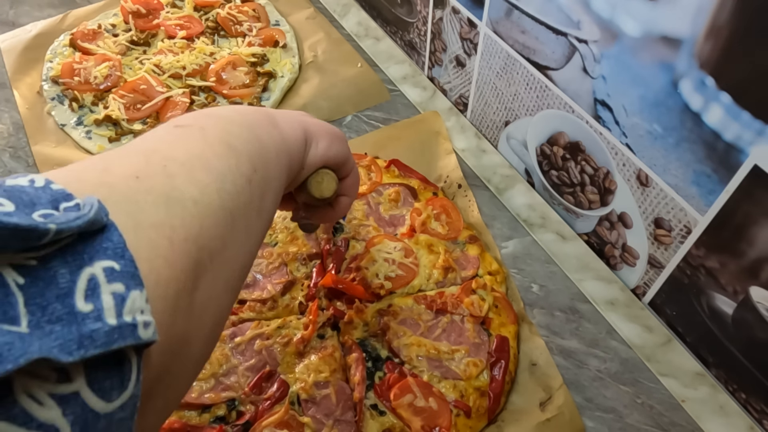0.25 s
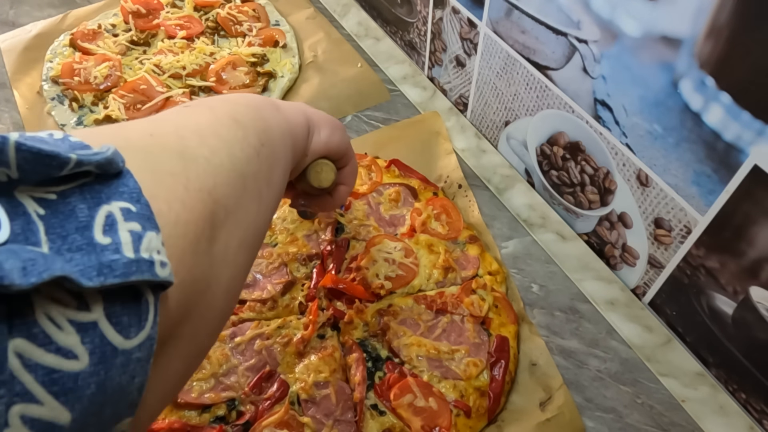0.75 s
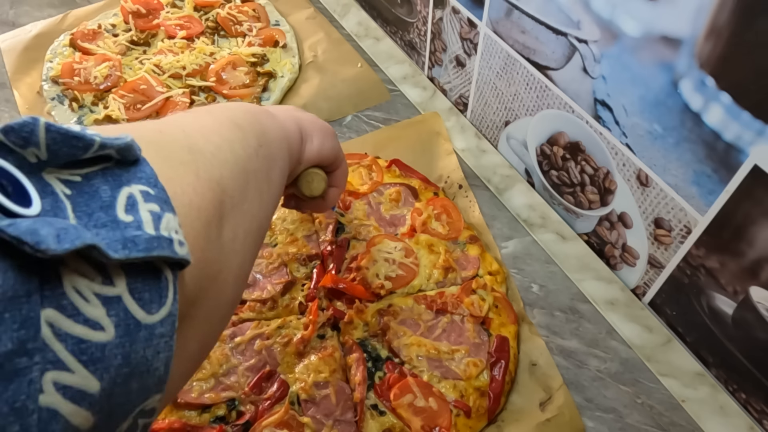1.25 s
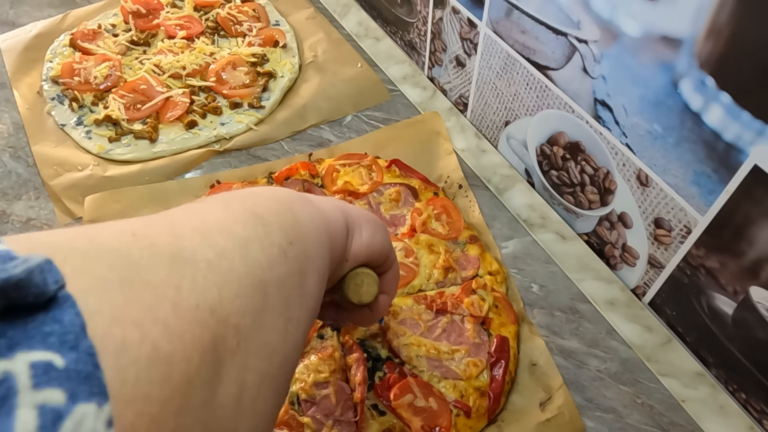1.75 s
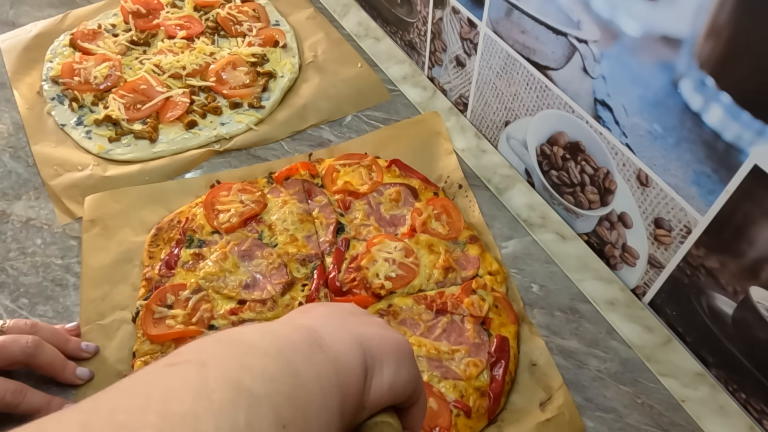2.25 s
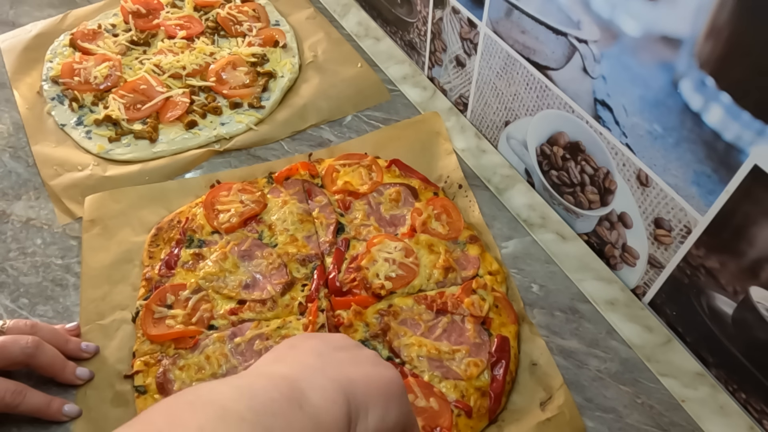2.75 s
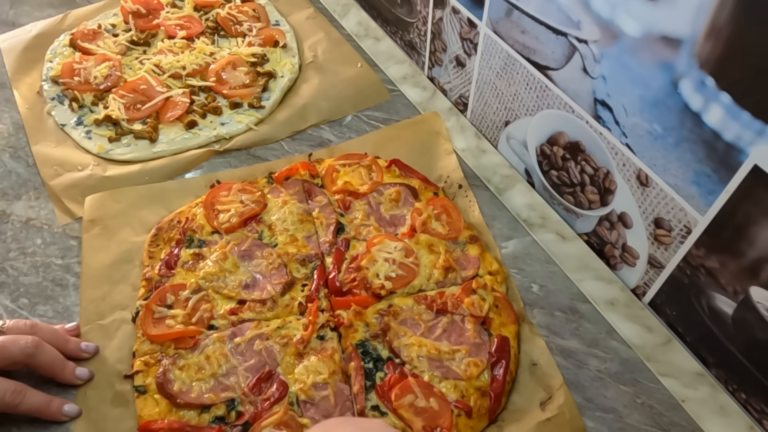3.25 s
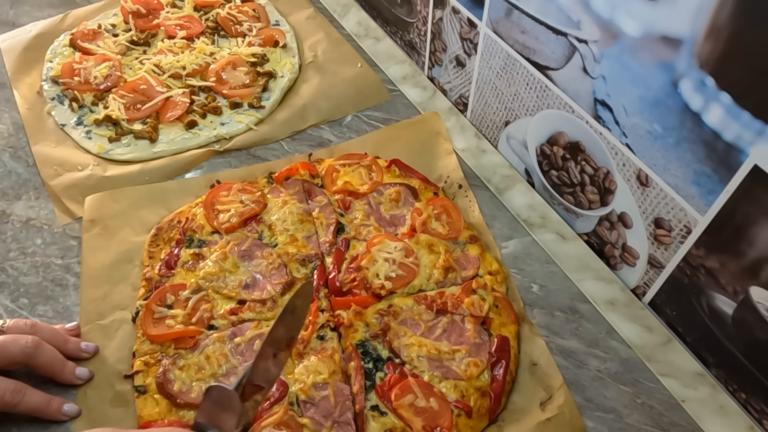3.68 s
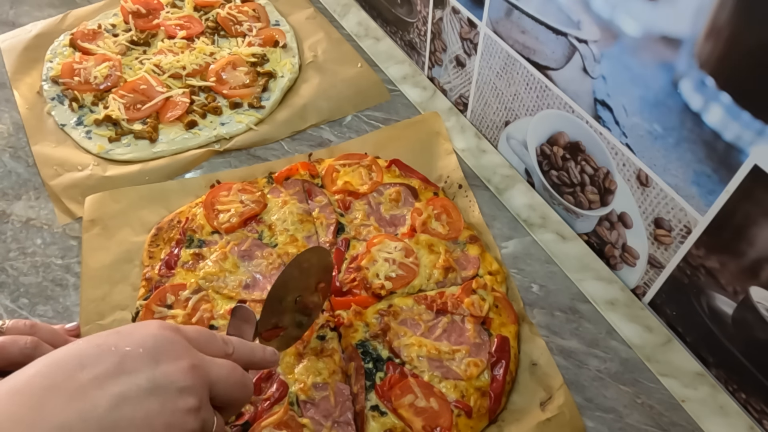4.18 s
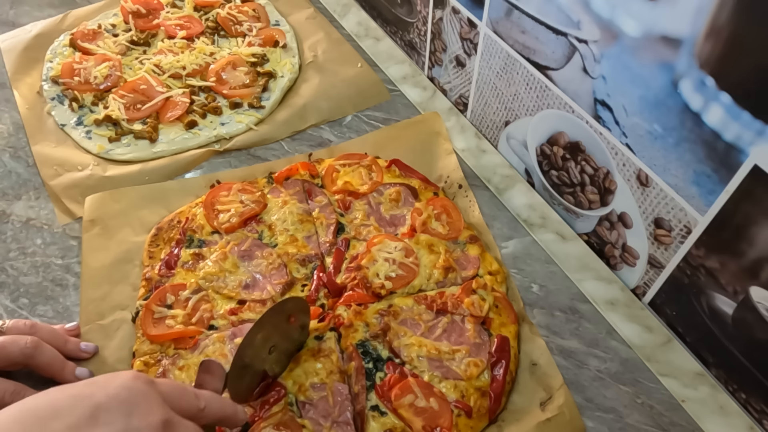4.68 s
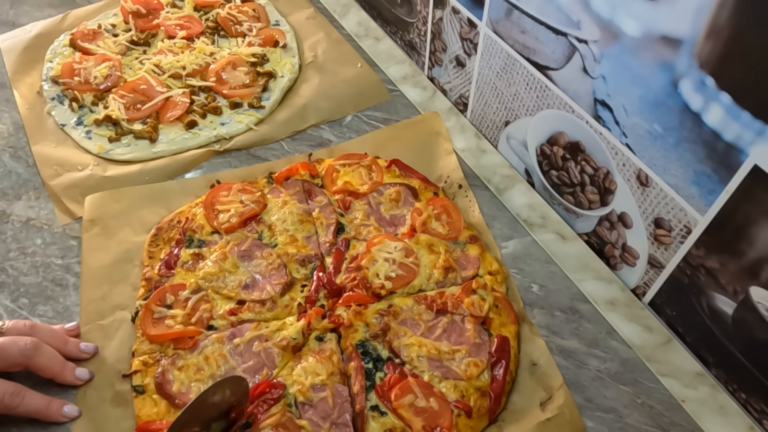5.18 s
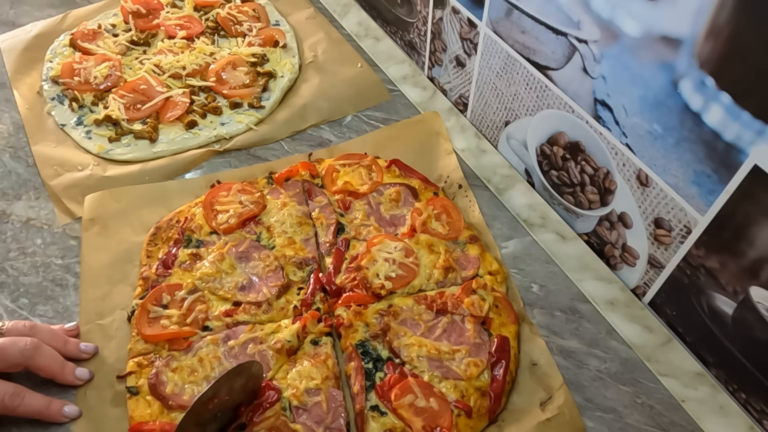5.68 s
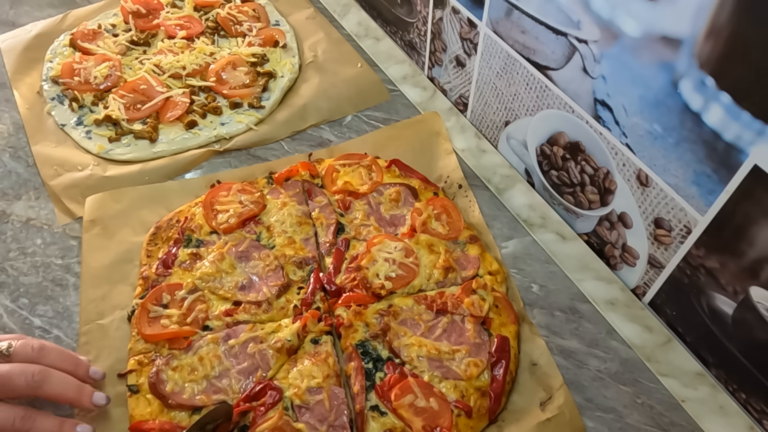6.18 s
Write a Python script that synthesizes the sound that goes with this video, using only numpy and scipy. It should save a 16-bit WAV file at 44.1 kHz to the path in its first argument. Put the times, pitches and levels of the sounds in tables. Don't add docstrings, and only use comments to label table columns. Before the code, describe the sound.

A close stereo microphone hears a steel cutting wheel pressing through baked pizza on paper. Crisp snaps, papery ticks and gritty rumbling come in uneven strokes, with low wooden thumps from the hollow counter. Midway the loose wheel rattles and faintly squeaks; then the last cut crunches up to a sharp, booming knock. Tiled walls add a short bright echo over quiet distant appliances.

```python
import sys
import numpy as np
from scipy import signal
from scipy.fft import rfft, irfft, next_fast_len
from scipy.io import wavfile
from scipy.ndimage import uniform_filter1d, map_coordinates

SR = 44100
rng = np.random.default_rng(int(sys.argv[2]) if len(sys.argv) > 2 else 0)


def store_pcm(level_fs):
    pcm = np.round(np.clip(level_fs, -1, 1) * 32767).astype(np.int16)
    wavfile.write(sys.argv[1], SR, np.atleast_2d(pcm).T)


def field_ratio(decibels):
    return 10 ** (np.asarray(decibels, dtype=float) / 20)


N = 283563
BASS_EDGE_HZ = 560
PORTS = np.array([[1], [-1]])


def colour(x, spectrum):
    hz, db = np.transpose(spectrum)
    size = next_fast_len(x.shape[-1])
    f = np.maximum(np.fft.rfftfreq(size, 1 / SR), 1)
    gain = field_ratio(np.interp(np.log(f), np.log(hz), db))
    return irfft(rfft(x, size) * gain, size)[..., :x.shape[-1]]


def unit(x):
    return x / np.sqrt(np.mean(x ** 2))


def band(x, lo_hz, hi_hz):
    sos = signal.butter(2, [lo_hz, min(hi_hz, .45 * SR)], "band", fs=SR, output="sos")
    return signal.sosfilt(sos, x)


def ring(modes, gains, stretch=0.86, size=14000):
    heard = gains > 0
    hz, db, t60 = np.transpose(modes)[:, heard, None]
    t = np.arange(size) / SR
    pole = 2j * np.pi * hz - np.log(1000) / (t60 * max(stretch, .2))
    return (gains[heard] * field_ratio(db[:, 0])) @ np.exp(pole * t).imag


def add(out, s, sound, peak_db):
    i = int(s * SR)
    n = min(len(sound), N - i)
    out[..., i:i + n] += np.multiply.outer(field_ratio(peak_db), sound[:n] / np.abs(sound).max())


def grit(rate, spread_db):
    out, count = np.zeros(N), int(rate * N / SR)
    sizes = field_ratio(spread_db * rng.exponential(size=count))
    out[rng.integers(0, N, count)] = sizes * rng.standard_normal(count)
    return out


def flicker(rate, depth_db):
    k = int(SR / rate)
    steps = np.repeat(rng.standard_normal(N // k + 1), k)[:N]
    return field_ratio(depth_db * uniform_filter1d(steps, k))


def swells(base_db, rows):
    out = field_ratio(base_db)
    for s, db, rise_ms, fall_ms in rows:
        i = np.arange(max(int((s - .2) * SR), 0), min(int((s + .2) * SR), N))
        lag_ms = 1e3 * (i / SR - s)
        out[i] += field_ratio(db) * np.exp(-np.abs(lag_ms) / np.where(lag_ms < 0, rise_ms, fall_ms))
    return out


# [from t/s, place: 0 back, 1 mid-slab, 2 front]
PLACES = [
    (0, 0),
    (1.005, 1),
    (1.04, 0),
    (1.9, 1),
    (3.57, 2),
    (6.005, 0),
]


def place(s):
    since, where = np.transpose(PLACES)
    return where.astype(int)[np.searchsorted(since, s, side="right") - 1]


# [f/Hz, level/dB, t60/s, extra level/dB mid-slab, extra level/dB at the front edge]
PANEL_MODES = [(159.2, -2, 0.11, -1, -6), (178.4, -5, 0.053, 4, 10.5), (248, -0.5, 0.089, -2, -2),
               (336, 0, 0.037, 1.5, 2.5), (388.5, 6, 0.066, 2.5, -4.5), (437.6, 4.5, 0.071, -1, -14),
               (580, -10, 0.02, 9, -6), (750, -0.5, 0.045, -4.5, 6), (994, 3.5, 0.019, -18.5, 7.5),
               (1159, 8, 0.019, 7, -7.5), (1267, 2, 0.035, 0.5, 1.5), (1363, -6, 0.017, 8.5, 8.5),
               (1564, -8.5, 0.016, 9, 14), (2890, -9, 0.036, 3.5, -15)]


def panels(lo_hz, hi_hz, stretch, where, spot=1., size=6000):
    modes = np.array(PANEL_MODES)
    inside = (modes[:, 0] > lo_hz) * (modes[:, 0] < hi_hz)
    gains = spot * field_ratio((where > 0) * modes[:, 2 + where]) * inside
    return band(ring(modes[:, :3], gains, stretch, size), lo_hz, hi_hz)


# [t/s, edge pressure on the counter level/dB, breaking crumbs level/dB]
ROLL = [(0.0, -58.5, -69.5), (.25, -68, -68), (.72, -70.5, -65), (1.3, -64, -69.5), (1.75, -59.5, -73.5),
        (1.95, -64.5, -76.5), (2.401, -75, -74.5), (2.55, -67, -67.5), (2.95, -72, -77), (3.3, -84, -74),
        (3.55, -61.5, -88), (3.8, -74, -71), (4.249, -79, -98), (4.7, -73, -70), (4.98, -60.5, -66),
        (5.15, -65, -76.5), (6.25, -62, -81.5), (6.43, -73.5, -73)]


def rolling():
    s, *columns = np.transpose(ROLL)
    pressure_db, crunch_db = (np.interp(np.arange(N) / SR, s, c) for c in columns)
    return crunching(crunch_db) + grinding(pressure_db) + rocking()


# [t/s of the top, rms level/dB, rise/ms, fall/ms]
CRUSHES = [(.1, -71, 8.4, 73), (0.598, -43, 17, 22), (.73, -78, 8.5, 32), (.84, -67, 43, 11),
           (.96, -52, 9.6, 21), (1.027, -35, 18, 10), (1.177, -42, 9.4, 5.6), (1.224, -41.5, 11, 17),
           (1.36, -49, 9.7, 12), (1.44, -64.5, 28, 240), (2.07, -80, 17, 72), (2.191, -57, 7.2, 11),
           (2.47, -65, 15, 64), (2.604, -47, 3.3, 6.6), (2.7, -55, 19, 19), (2.83, -52, 10.5, 37),
           (3.0, -74, 6, 10), (3.059, -62.5, 23, 43), (3.22, -70, 14, 36), (3.385, -64, 12, 16),
           (3.457, -39.5, 14.5, 15.4), (3.63, -55.5, 37, 39), (4.44, -59.5, 34, 72), (4.8, -59, 21, 18),
           (4.875, -59, 19, 20), (5.06, -63.5, 47, 25), (5.228, -71, 7.3, 7.2), (5.25, -57, 37, 16),
           (5.32, -45, 26, 26), (5.43, -52, 13, 29), (5.5, -65, 6.9, 8.9), (5.592, -51, 5.5, 5.9),
           (5.62, -64, 29, 64), (5.673, -33, 21, 14.5), (5.74, -52.5, 7.6, 15), (5.824, -45, 23, 14),
           (5.852, -59, 5, 10), (5.947, -43.5, 11.5, 17), (5.988, -31, 5.4, 4.9), (6.15, -51.5, 120, 75)]
# [f/Hz, level/dB per Hz]
CRUST_SPECTRUM = [(880, -36), (1500, 1.5), (1940, -5), (2110, -2), (2450, 0), (3350, -1), (4080, -3.5),
                  (5120, -2), (5530, -3), (7730, -3.5), (9600, -15), (12300, -11.5), (15700, -27)]


def crunching(crunch_db):
    clusters, crumbs = flicker(250, 2.0), 0
    for lo_hz, hi_hz in [(900, 3500), (3500, 7000), (7000, 18000)]:
        patchy = clusters * flicker(23, 3.7)
        mid, side = (grit(3000, 2.3) * patchy for _ in "ms")
        crumbs = crumbs + band(mid + 0.45 * side * PORTS, lo_hz, hi_hz)
    return swells(crunch_db, CRUSHES) * unit(colour(crumbs, CRUST_SPECTRUM))


# [t/s of the top, rumble level/dB, bass
# level/dB, fall/ms]
GRINDS = [(.34, -65, -63.5, 110), (0.595, -47.5, -50, 19), (0.826, -57, -42, 13.4), (0.909, -53, -59, 11),
          (0.954, -45, -38.5, 19), (1.015, -41, -36, 16), (1.029, -46, -21.5, 9), (1.07, -52, -48, 22),
          (1.146, -49, -58, 4.8), (1.17, -51.5, -48.5, 33), (1.199, -51, -52, 8), (1.268, -42.5, -52, 4.7),
          (1.225, -40, -40, 20.7), (1.36, -39.5, -34.5, 11.3), (1.405, -52.5, -47.5, 15),
          (1.566, -49, -53, 14), (1.596, -42.5, -41, 29), (1.668, -43, -43.5, 24), (1.71, -51.5, -71, 40),
          (2.07, -58, -62, 76), (2.19, -57, -63, 19), (2.499, -55.5, -63, 29), (2.635, -46.5, -41, 31),
          (2.75, -60, -55, 23), (2.828, -44, -38.5, 28.5), (2.877, -50.5, -46, 12), (2.984, -55, -72, 6.2),
          (3.018, -51.5, -43.5, 7.5), (3.044, -45.5, -42, 9), (3.084, -54, -50.5, 83), (3.19, -67, -62, 20),
          (3.245, -53, -48, 20), (3.36, -55, -69, 6.7), (3.388, -50.5, -45, 27), (3.459, -35, -35, 15.2),
          (3.65, -56, -59, 64),
          (3.85, -66, -75, 51), (4.0, -65.5, -60.5, 120), (4.8, -75, -57, 17), (4.86, -65, -54, 25),
                (5.041, -65, -50, 42), (5.2, -54.5, -46, 15), (5.231, -49.5, -39, 16),
                (5.301, -52.5, -45.5, 26), (5.343, -45.5, -38.5, 11.5), (5.46, -71, -50, 18),
                (5.595, -54, -41.5, 13), (5.66, -42.5, -38, 35), (5.715, -56, -48, 20),
                (5.833, -45.5, -32, 17.7), (5.961, -44, -46, 29), (5.987, -34, -28, 6.4),
                (6.04, -36, -67, 54), (6.1, -45, -68, 11), (6.15, -54, -68, 11), (6.19, -53, -57, 17),
                (6.3, -58, -60, 20)]


def grinding(pressure_db):
    where, grinds = place(np.arange(N) / SR), GRINDS
    rise_share = 0.6
    rumble = swells(pressure_db, [(s, db, rise_share * ms, ms) for s, db, _, ms in grinds])
    bass = swells(pressure_db, [(s, db, rise_share * ms, ms) for s, _, db, ms in grinds])
    out = np.zeros(N)
    for lo_hz, hi_hz, force in [(BASS_EDGE_HZ, 3300, rumble), (125, BASS_EDGE_HZ, bass)]:
        push = force * unit(grit(4000, 1.5) * flicker(40, 2))
        for spot in range(3):
            answer = panels(lo_hz, hi_hz, 0.8, spot)
            answer = answer / np.linalg.norm(answer)
            out += signal.fftconvolve(push * (where == spot), answer)[:N]
    return out


# [t/s, level/dB]
LEANS = [(.3, -62), (.59, -54), (1.029, -35), (1.08, -42), (1.25, -48.5), (1.41, -56), (1.7, -54),
         (2.22, -60), (2.61, -47), (2.8, -46), (2.92, -48), (3.1, -51), (3.25, -51), (3.5, -61),
         (3.92, -61.5), (4.69, -58), (5.0, -53), (5.37, -53), (5.52, -49), (6.0, -37)]
# [f/Hz, level/dB, t60/s]
FRAME = [
    (38.6, 0, 0.22),
    (57.8, -9.5, 0.2),
]


def rocking():
    rest_db, rise_ms, fall_ms = -61., 43, 36
    shake = swells(np.full(N, rest_db), [(s, db, rise_ms, fall_ms) for s, db in LEANS])
    frame = band(ring(FRAME, np.ones(len(FRAME)), 0.69, size=9000), 34.7, 68)
    push = shake * unit(grit(4000, 1.3) * flicker(40, 1.6))
    return signal.fftconvolve(push, frame / np.linalg.norm(frame))[:N]


# [t/s, peak level/dB, centre f/Hz]
CRUST_SNAPS = [(0.5023, -52, 2300), (0.5946, -47, 2800), (0.6373, -45, 2760), (0.8172, -34.5, 2460),
               (0.948, -36, 2620), (0.9547, -31.5, 3080), (0.998, -36, 4500), (1.0113, -26, 3850),
               (1.022, -29, 3200), (1.2222, -36.5, 2560), (1.2496, -34, 3040), (1.3286, -45, 2800),
               (1.348, -39, 3400), (1.3587, -30, 2900), (1.3983, -42, 2290), (1.557, -41, 2380),
               (1.6472, -48, 2130), (1.6644, -43, 2140), (2.0597, -50.5, 2850), (2.186, -63, 2900),
               (2.493, -50, 2960), (2.702, -55, 2830), (2.7178, -36, 2450), (2.7834, -43, 2840),
               (2.8137, -41, 2560), (2.821, -33, 2760), (2.839, -38, 2200), (3.0705, -41.5, 2220),
               (3.448, -34.5, 4030), (3.4513, -37, 1570), (3.462, -32, 1700), (5.2276, -53, 5300),
               (5.246, -48, 3570), (5.2836, -49, 3990), (5.434, -45, 3050), (5.471, -43.5, 3600),
               (5.634, -42, 1900), (5.642, -35, 2610), (5.669, -18.5, 3480), (5.6764, -27, 2880),
               (5.7707, -41.5, 2160), (5.959, -34, 3000), (5.9838, -24, 4740), (5.9914, -16.5, 3560),
               (6.106, -38, 3080), (6.2656, -42.5, 3520)]
# [t/s, peak level/dB, centre
# f/Hz]
PAPER_TICKS = [(0.0908, -51, 5200), (0.262, -52.5, 5570), (0.4653, -43, 6400), (0.552, -42, 5640),
               (0.5786, -44, 3660), (0.722, -40.5, 7000), (0.8744, -42.5, 3700), (0.9754, -34, 4090),
               (1.1254, -43, 4020), (1.134, -40.5, 3630), (1.1707, -28, 6540), (1.196, -37, 3670),
               (1.211, -29.5, 6700), (1.3577, -40, 4140), (2.6061, -32, 5160), (3.432, -49, 3920),
               (4.9384, -36.5, 4500), (5.248, -42, 7660), (5.2894, -40, 5100), (5.3037, -30.5, 4040),
               (5.413, -41, 7800), (5.589, -47, 6900), (5.729, -39, 6650), (5.8223, -34, 7000),
               (5.847, -32, 3730), (5.9384, -48, 7200), (6.121, -29.5, 4440), (6.1482, -37.5, 7860),
               (6.1648, -34, 4940), (6.2057, -33, 8300),
               (2.0981, -56, 7160), (2.1206, -58, 7130), (2.284, -53.5, 6030), (2.3, -54.5, 7000),
          (2.414, -55, 5000), (2.454, -57, 5060), (2.597, -36.5, 4500), (2.65, -50, 5500),
          (2.68, -54, 6500), (4.785, -55, 3550), (4.8653, -46, 3530), (5.02, -49, 6560),
          (5.3258, -45, 4400), (5.348, -37.5, 5820), (5.4244, -51, 7440), (5.5107, -44.5, 4800),
          (5.567, -50, 7330), (6.132, -40, 4500)]
# [t/s, peak level/dB, centre f/Hz, length/ms]
SCRAPES = [(3.6124, -30, 4660, 17), (3.6525, -34.5, 3800, 29), (3.6692, -39.5, 3180, 22),
           (3.845, -37.5, 3660, 77), (3.893, -43, 2450, 27), (3.917, -50, 3830, 14),
           (3.9318, -30, 2930, 16), (3.94, -40, 4830, 38), (4.0086, -29.5, 5100, 75),
           (4.062, -36, 4500, 27), (4.4211, -31.5, 6170, 23), (4.4203, -41.5, 1700, 24),
           (4.4838, -43.5, 2800, 30), (4.4992, -43, 4160, 36), (4.537, -51, 3000, 38),
           (4.662, -48, 5570, 7.9), (4.702, -57, 6500, 19)]


def cracks():
    out, t = np.zeros(N), np.arange(4096) / SR
    snap_ms, tick_ms, spray_share = 23.3, 20.5, 0.73
    rows = [(s, db, hz, snap_ms) for s, db, hz in CRUST_SNAPS]
    rows += [(s, db, hz, tick_ms) for s, db, hz in PAPER_TICKS]
    rows += SCRAPES
    noise = rng.standard_normal((len(rows), len(t) + 64))
    for (s, db, hz, ms), n in zip(rows, noise):
        ragged = field_ratio(4 * np.repeat(n[:64], 64)) * np.minimum(t / .0015, 1)
        spray = colour(n[64:], CRUST_SPECTRUM) * ragged * field_ratio(-60e3 * t / max(ms, 3))
        wide = band(band(spray, hz / 2.4, hz * 2.4), hz / 2.4, hz * 2.4)
        centre = band(spray, hz / 1.094, hz * 1.203)
        add(out, s - .001, spray_share * wide + centre, db)
    return out


# [t/s, peak level/dB, bass share level/dB, slab share level/dB, contact/ms]
KNOCKS = [(0.285, -55.5, 8, -25, 1.1), (0.817, -45, 10.5, -7, 3), (1.026, -13, -7.5, -20.5, 2.67),
          (1.253, -28, -13, -33, 3.8), (1.359, -35.5, -11, -14, 4), (1.581, -23, -10, -27, 1.16),
          (2.607, -32, 12.5, -18, 2.5), (2.719, -34, 4, -14, 3.6), (2.836, -35, 3, -18, 5.1),
          (3.072, -36, 0.5, -21.5, 3.5), (3.249, -44, 5, -15, 3.1), (3.369, -40, 5, -33, 3.6),
          (3.451, -35, 2, -30, 4.3), (4.989, -56, 17, -21, 3.8), (5.497, -41, 8, -23, 4),
          (5.665, -30.5, 6.5, -11, 4.6), (5.795, -36, -4, -9, 6.9), (5.829, -25, 4.5, -21, 3),
          (5.996, -5.5, -8.5, -24.5, 1.66)]
# [f/Hz, level/dB, t60/s]
SLAB = [
    (113.2, 8.5, 0.58),
    (123.7, -19, 0.21),
    (102.3, -17, .25),
]


def knocks():
    out = np.zeros(N)
    chance = rng.standard_normal((len(KNOCKS), 2048 + len(PANEL_MODES)))
    edge_share, grain = 0.11, 0.49
    sink_ms, knock_top_hz = 2.77, 1800
    back_ring, front_ring = 0.95, 0.76
    late = 1 - np.exp(-np.arange(22000) / (0.0086 * SR))
    sway = ring(SLAB, np.ones(len(SLAB)), size=22000) * late
    for (s, db, bass_db, slab_db, ms), c in zip(KNOCKS, chance):
        t = np.arange(2048) / SR * 1e3 / max(ms, .3)
        push = t ** 2 * np.exp(-3 * t)
        edge = (t / edge_share) ** 2 * np.exp(-3 * t / edge_share)
        bite = edge + grain * push * c[:2048]
        spot, where = field_ratio(1.0 * c[2048:]), place(s)
        stretch = front_ring if where == 2 else back_ring
        answer = panels(BASS_EDGE_HZ, 3030, stretch, where, spot)
        blow = band(signal.fftconvolve(answer, bite), 200, knock_top_hz)
        sink = np.minimum(np.arange(len(blow)) / SR * 1e3 / sink_ms, 1)
        thump = signal.fftconvolve(panels(125, BASS_EDGE_HZ, stretch, where, spot), push ** 8)
        add(out, s - .0018, blow * sink, db)
        add(out, s - .002, thump, db + bass_db)
        add(out, s, sway, db + slab_db)
    return out


# [t/s, peak level/dB, ring factor, best excited f/Hz]
RATTLES = [(3.6097, -37, 0.53, 3000), (3.651, -42, 0.34, 3000), (3.842, -30.5, 0.26, 3670),
           (3.857, -43, 0.69, 2600), (3.918, -39, 0.76, 3700), (3.932, -23, 0.96, 4850),
           (3.9397, -28, 0.56, 3580), (4.0097, -16.5, 1.8, 4000), (4.061, -41, 0.5, 6000),
           (4.4195, -34, 0.14, 3900), (4.5023, -47, 1.1, 4500)]
# [f/Hz, level/dB, t60/s]
WHEEL = [(1700, -20, 0.0074), (2300, -5.5, .010), (2620, -6.5, 0.0141), (2840, 0.5, 0.03), (3000, 0, 0.013),
         (3490, -9, 0.011), (3770, 4.5, 0.0098), (4040, 4, 0.012), (4500, -14, .014), (4740, 2.5, 0.015),
         (4940, 1, 0.018), (5530, -24, 0.016), (6400, -3, 0.02), (7400, -31, .012)]


def rattles():
    out, count = np.zeros(N), len(WHEEL)
    tilt_db_per_octave = 2
    chance = rng.standard_normal((len(RATTLES), 512 + 2 * count))
    for (s, db, stretch, hz), c in zip(RATTLES, chance):
        tap = (np.arange(512) == 8) + 0.24 * c[:512] * np.exp(-np.arange(512) / 173.0)
        modes = np.array(WHEEL) * np.c_[1 + .006 * c[512:-count], np.ones((count, 2))]
        octaves_off = np.abs(np.log2(modes[:, 0] / hz))
        gains = field_ratio(1.3 * c[-count:] - tilt_db_per_octave * octaves_off)
        clink = signal.fftconvolve(ring(modes, gains, stretch, size=4000), tap)
        add(out, s, band(clink, 1720, 6700), db)
    return out


# [t/s, peak level/dB, f/Hz, length/ms]
SQUEAKS = [(1.66, -49, 2140, 23), (1.75, -60, 2400, 100), (2.735, -52.5, 2410, 50), (3.03, -62.5, 4200, 35),
           (3.32, -74, 3080, 80), (3.73, -63, 2380, 110), (4.07, -54.5, 4920, 120), (4.31, -66.5, 2920, 73),
           (4.797, -55.5, 2270, 22), (4.797, -56, 3580, 42), (4.8, -61, 5300, 28), (5.03, -60, 2920, 40),
           (5.258, -53, 3600, 35), (5.254, -53, 7400, 25), (5.43, -56, 7600, 40), (5.74, -52, 6700, 30)]


def squeaks():
    out, t = np.zeros(N), np.arange(-4096, 4096) / SR
    width = 1.03
    noise = rng.standard_normal((len(SQUEAKS), len(t)))
    for (s, db, hz, ms), n in zip(SQUEAKS, noise):
        swell = np.exp(-(2150.0 * t / ms) ** 2)
        add(out, s + t[0], band(n, hz / width, hz * width) * swell, db)
    return out


def linger(x, spectrum, t60_s, db, apart, stir_ms):
    t = np.arange(SR // 2) / SR
    fade = field_ratio(-60 * t / t60_s) * np.clip(t / 0.002, 0, 1)
    mid, side = rng.standard_normal((2, len(t)))
    for _ in range(8):
        bins = rfft(mid * fade)
        even = irfft(bins / (np.abs(bins) + 1e-9), len(t))
        mid = even / np.sqrt(uniform_filter1d(even ** 2, size=400) + 1e-18)
    tail = colour(mid + apart * side * PORTS, spectrum) * fade
    tail = tail / np.sqrt(np.sum(tail ** 2) / 2)
    wet = signal.fftconvolve(x[None], tail, axes=1)[:, :N]
    stir = uniform_filter1d(rng.standard_normal(N), size=110)
    stir = unit(uniform_filter1d(stir, size=110))
    path = np.arange(N) + stir * stir_ms * SR / 1e3
    return field_ratio(db) * np.array([map_coordinates(w, [path], mode="nearest") for w in wet])


# [f/Hz, level/dB]
CABINET = [(90, -7), (160, -10), (430, -8), (600, -10), (800, -4.5), (1200, -2.5), (1600, -23.5),
           (2600, -15.5)]


def cabinet(x):
    return linger(x, CABINET, t60_s=0.22, db=-15, apart=1.0, stir_ms=0.14)


# [f/Hz, level/dB]
WALLS = [(500, -26.5), (1800, -4.5), (2700, -2), (5000, -5), (8000, -5.5), (12000, -2)]


def walls(x):
    return linger(x, WALLS, t60_s=0.29, db=-8.5, apart=0.37, stir_ms=0.081)


# [f/Hz, level/dB per Hz]
KITCHEN = [(12, -32), (20, -4.5), (49, -9), (95, -15.5), (157, 2.5), (325, -16.5), (395, -10.5), (552, -21),
           (2860, -26.5), (3990, -45), (5580, -30), (15700, -53.5)]


def kitchen():
    mid, side = rng.standard_normal((2, N))
    side = colour(side, [(20, -12), (100, -13), (300, -0.5), (1000, 3.0), (5000, -10.0)])
    return field_ratio(-62) * unit(colour(mid + side * PORTS, KITCHEN))


def scene():
    near = rolling() + cracks() + knocks() + rattles() + squeaks()
    both = near.mean(axis=0)
    return near + cabinet(both) + walls(both) + kitchen()


def roll_off(x):
    return signal.sosfilt(signal.butter(12, 15830, fs=SR, output="sos"), x)


def record(dry):
    late = colour(np.roll(dry[0], 1) - dry[0], [(2500, 10.5), (9000, -16.5)])
    # (f/Hz, half of left minus right/dB)
    tilt = np.array([(60, 0.0), (300, -0.5), (1200, 0.27), (2500, -0.4), (5000, 1.0), (9000, 2.0), (14000, 4.5)])
    left = colour(dry[0] + late, tilt)
    right = colour(dry[1], tilt * [1, -1])
    mix = colour(np.array([left, right]), [(15770, 0), (15830, -80)])
    return roll_off(mix)


dry = scene()
out = record(dry)
store_pcm(out)
```